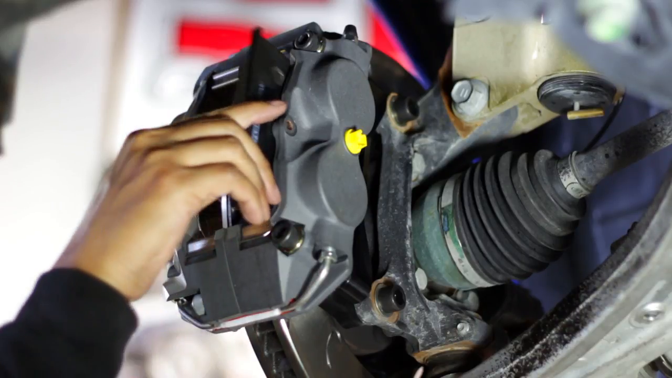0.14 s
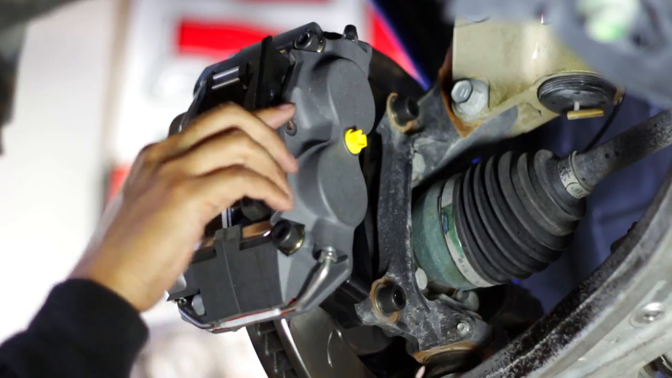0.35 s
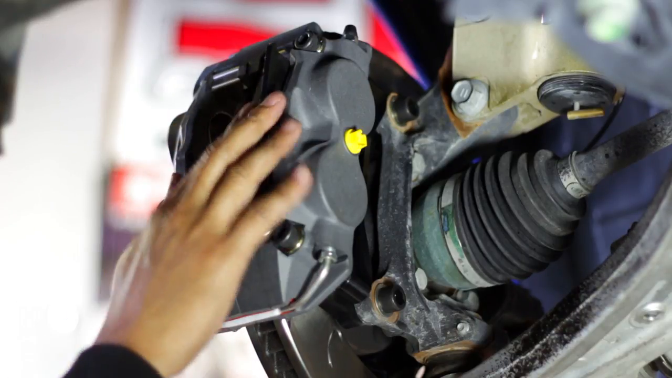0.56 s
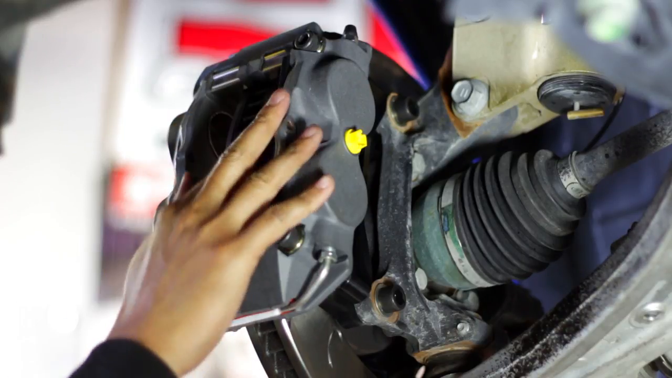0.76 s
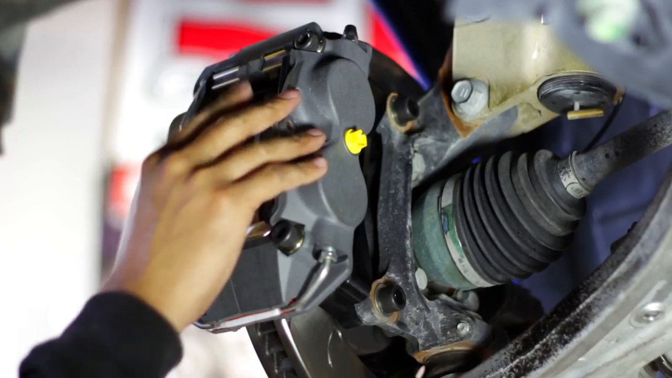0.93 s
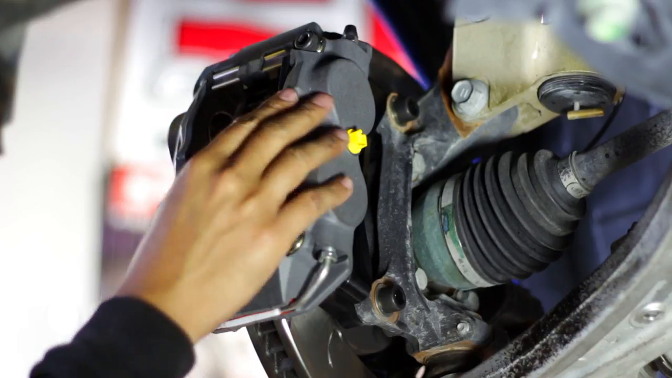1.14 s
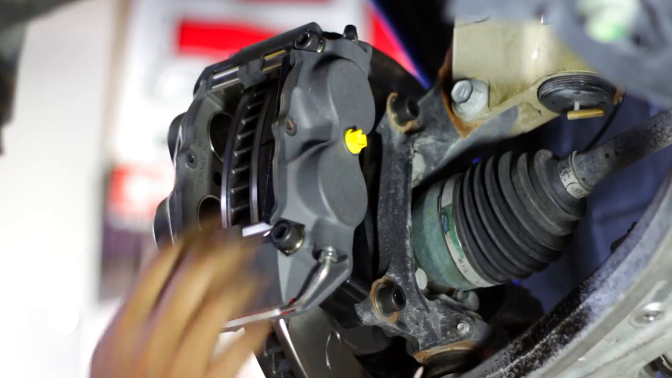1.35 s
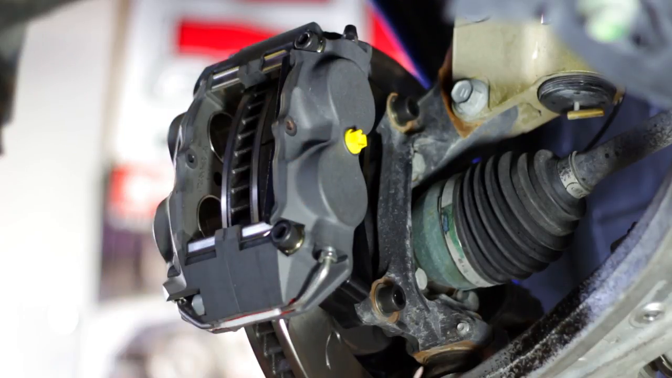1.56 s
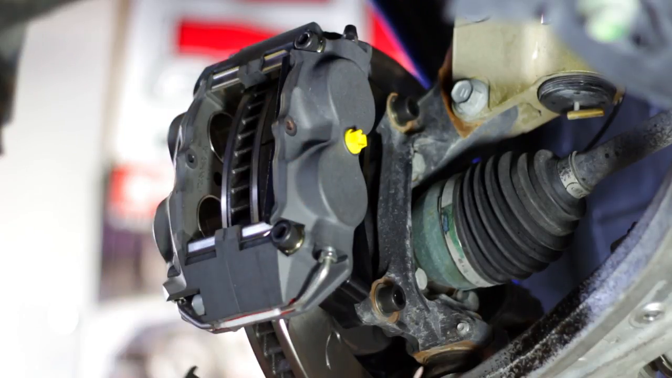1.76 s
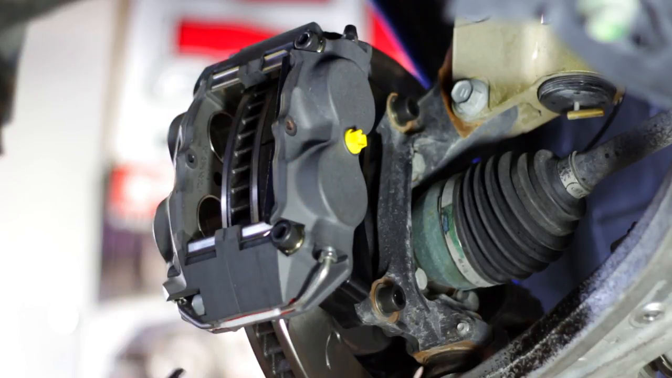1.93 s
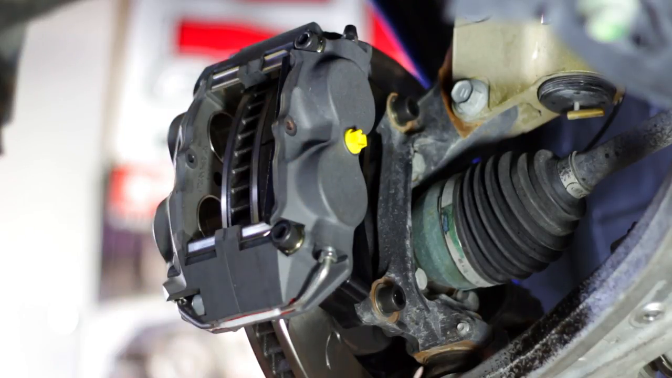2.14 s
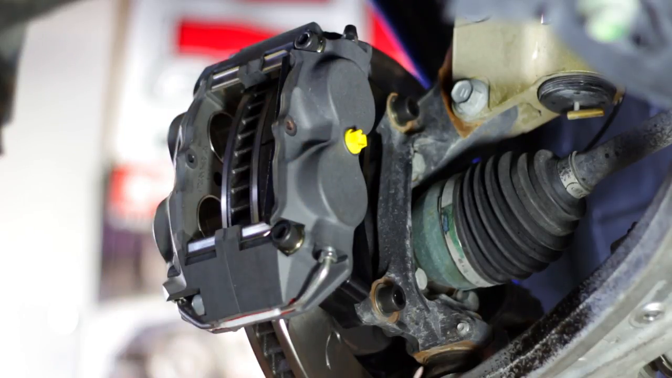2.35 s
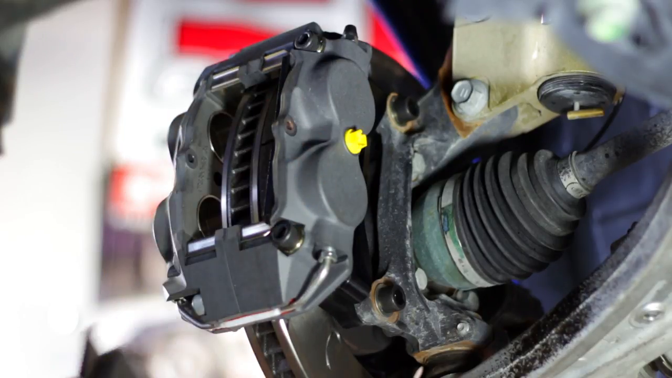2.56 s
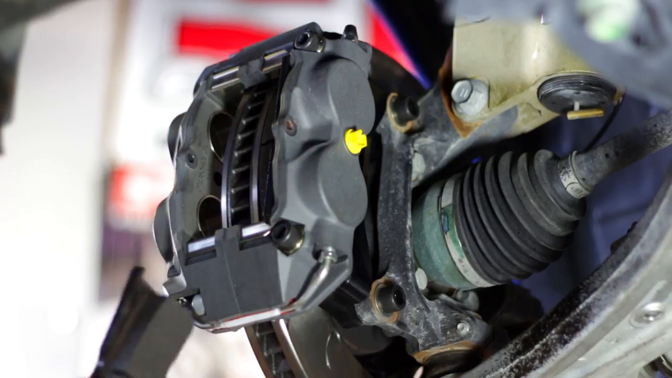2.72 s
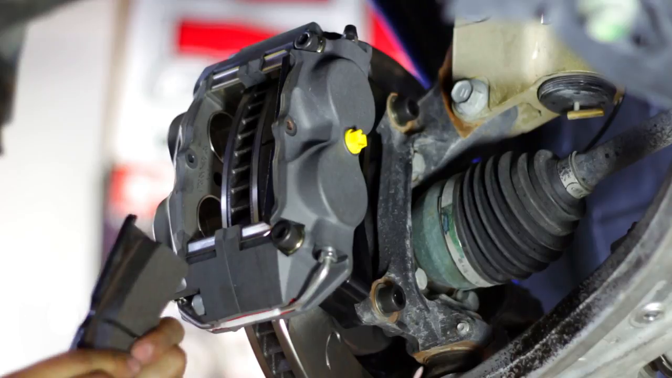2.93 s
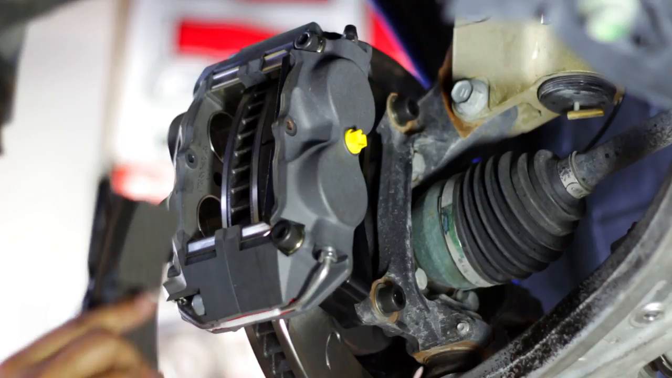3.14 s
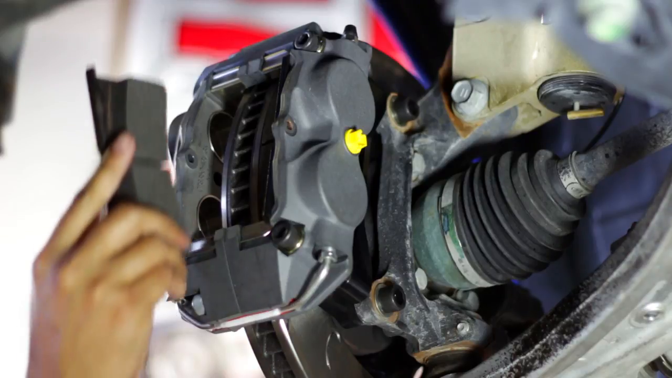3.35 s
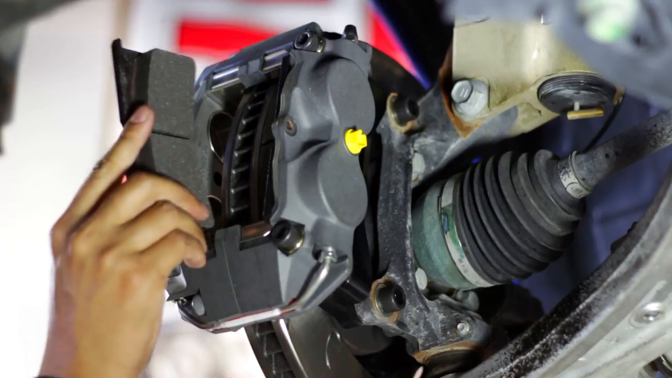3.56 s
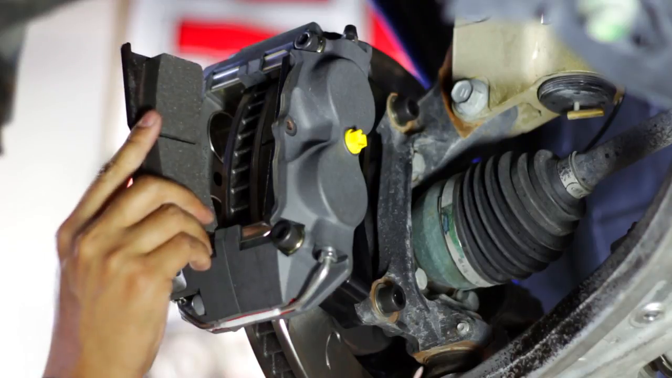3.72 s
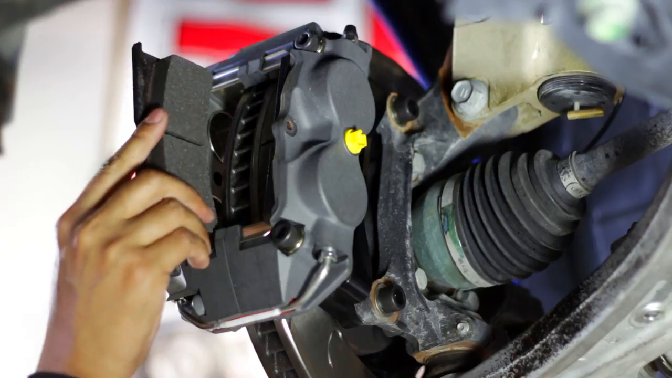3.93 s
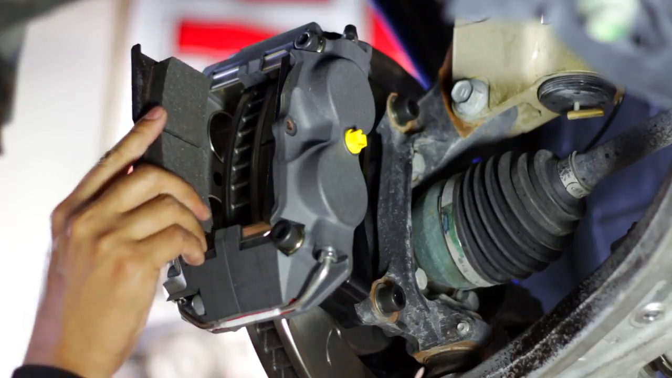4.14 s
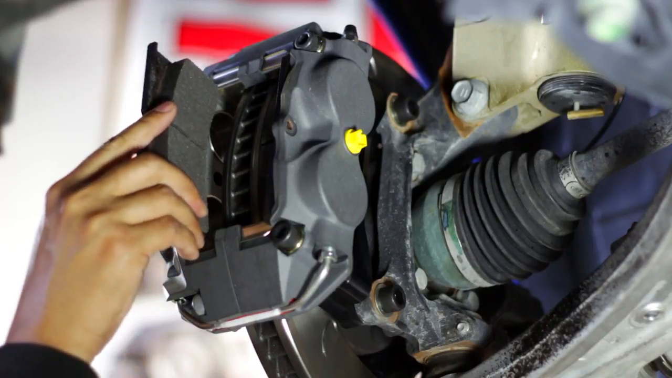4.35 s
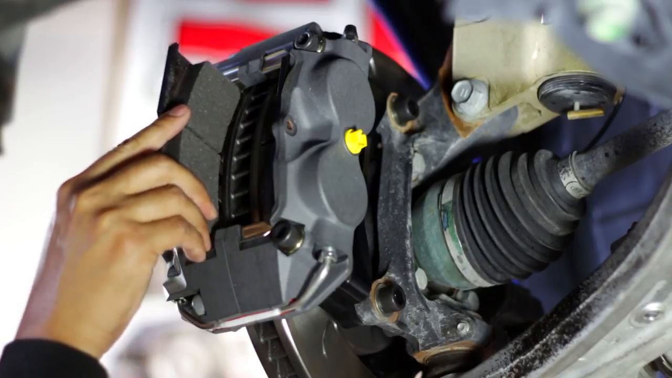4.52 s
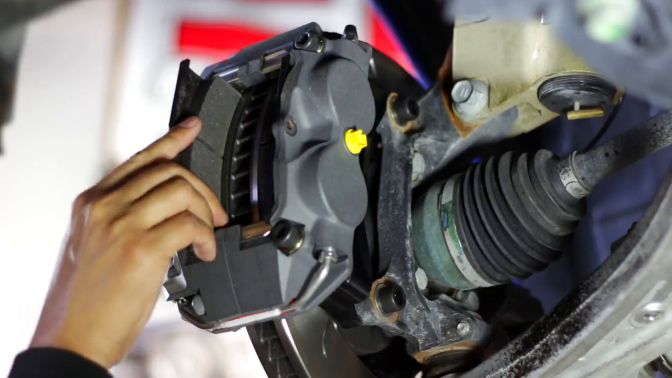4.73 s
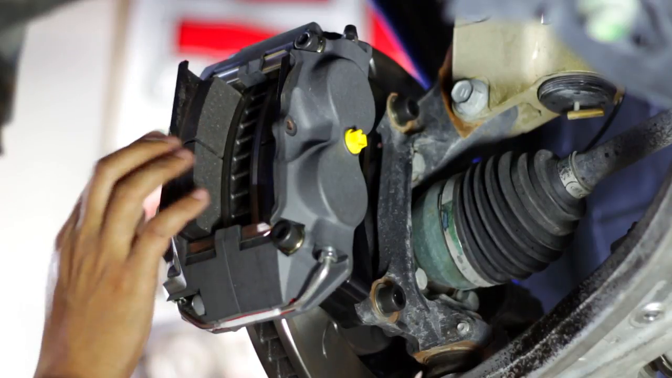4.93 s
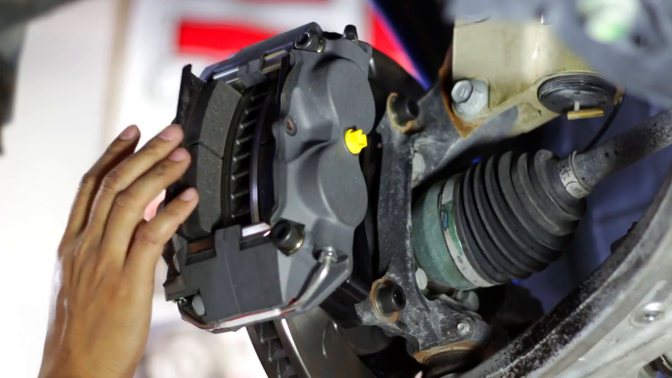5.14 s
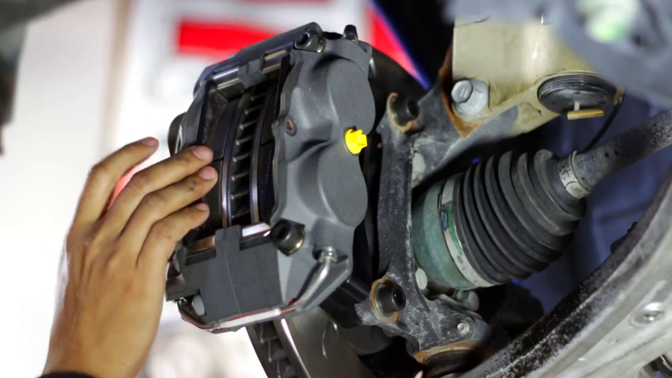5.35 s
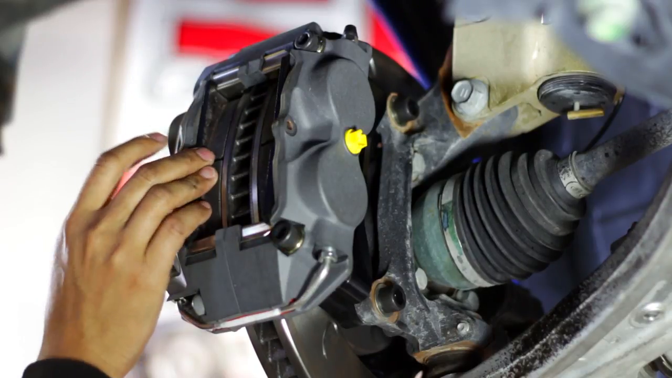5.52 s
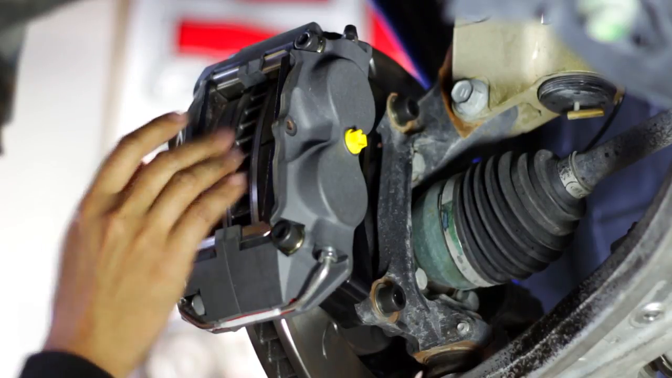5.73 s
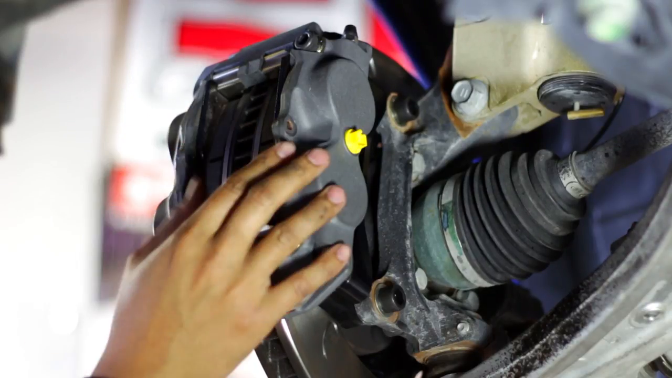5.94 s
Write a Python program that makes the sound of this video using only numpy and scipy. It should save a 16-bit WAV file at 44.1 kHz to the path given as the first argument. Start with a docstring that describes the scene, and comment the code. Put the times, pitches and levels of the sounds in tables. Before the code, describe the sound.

Hand fitting of metal brake pads, heard close and centred, with short diffuse reflections from garage walls. Dull thuds, dry clicks and brief rubbing lead to a bright clatter and two knocks. After over two seconds of faint fan hum, softer taps and slides resume, ending in a strong metallic snap, a scrape and a fading ring.

```python
"""Fitting brake pads by hand

Two brake pads are pushed by hand into a car's caliper, in a small garage. Their steel backing plates tap and
scrape along the casting, then seat with a clack. Blows and random slips excite decaying modes and dense noise;
freed plates, and the caliper after the seating clack, ring on. The walls answer with a diffuse tail, and
filtered noise and fan tones murmur behind."""
import sys
import numpy as np
from scipy import signal
from scipy.fft import rfft, irfft, next_fast_len
from scipy.io import wavfile
from scipy.ndimage import map_coordinates

SR = 44100
rng = np.random.default_rng(int(sys.argv[2]) if len(sys.argv) > 2 else 0)


def pcm_store(signal):
    """Save signal as 16-bit PCM."""
    levels = np.round(np.clip(np.atleast_2d(signal), -1, 1) * 32767)
    wavfile.write(sys.argv[1], SR, levels.astype(np.int16).T)


N = 268128  # length in samples

# Modes of each pad's backing plate. Each row: frequency in Hz, relative level in dB, t60 in seconds.
INNER_PAD = [(2050, 1, 0.062), (3063, -1.5, 0.067), (3300, -5, 0.028), (4233, -1, 0.011),
             (7450, -21.5, .03)]
OUTER_PAD = [(2077, 1.5, 0.08), (2065, 3, .055), (3110, -20.5, 0.04), (4330, -19.5, 0.04)]
SWAP_S = 3  # the inner pad goes in before this time, the outer pad after it


def amp(db):
    """Level: decibels to amplitude gain."""
    return 10 ** (np.asarray(db) / 20)


def unit(x):
    """Normalisation: x at rms 1."""
    return x / np.sqrt(np.mean(x ** 2) + 1e-20)


def struck(x):
    """Normalisation of a transient: x at rms 1 over its first 15 ms."""
    return x / np.sqrt(np.mean(x[:int(.015 * SR)] ** 2) + 1e-20)


def along(points, hz):
    """Interpolation: (Hz, value) points read on a logarithmic frequency axis."""
    f, v = np.transpose(points)
    return np.interp(np.log(hz + 1), np.log(f + 1), v)


def wobble(rate):
    """Slow random modulation: a smooth curve through random knots, rate of them a second."""
    knots = rng.standard_normal(int(N * rate / SR) + 4)
    return map_coordinates(knots, [np.arange(N) * rate / SR])


def filtered(x, response):
    """Zero-phase filtering: the spectrum of x times a response of frequency."""
    n = x.shape[-1]
    m = next_fast_len(n + 8192)  # silence appended against wrap-around
    return irfft(rfft(x, m) * response(np.fft.rfftfreq(m, 1 / SR)), m)[..., :n]


def coloured(x, points, size=2048):
    """Minimum-phase filtering: a folded cepstrum makes a causal filter of the given dB curve."""
    cepstrum = irfft(np.log(amp(along(points, np.fft.rfftfreq(size, 1 / SR)))))
    cepstrum[1:size // 2] *= 2
    cepstrum[size // 2 + 1:] = 0
    impulse_response = irfft(np.exp(rfft(cepstrum)))
    return signal.fftconvolve(x, impulse_response)[:len(x)]


def band(x, hz, kind, order=4):
    """Causal Butterworth filtering: low-, high- or band-pass."""
    edges = np.minimum(hz, SR / 2 - 100)
    return signal.sosfilt(signal.butter(order, edges, kind, fs=SR, output="sos"), x)


def add(track, s, x):
    """Superposition: mix x into track from time s in seconds."""
    part = track[max(round(s * SR), 0):][:len(x)]
    part += x[:len(part)]


def ventilation(level_db=-60, rumble_hz=250, rumble_sway_db=3.5, air_sway_db=2.5, hum_db=-3):
    """Broadband flow noise, partly coherent between the ears, whose level sways, with unsteady fan tones."""
    # Each row: frequency in Hz, relative spectral level in dB per Hz.
    murmur_spectrum = [(22, -13.5), (30, -8.5), (55, -10), (100, -9), (146, -3), (175, -8), (320, -9),
                       (400, -12), (470, -5), (560, -11.5), (800, -13), (1000, -19), (1300, -29),
                       (2400, -40.5), (5000, -120)]
    # Each row: frequency in Hz, left-right correlation.
    likeness = [(25, 0.26), (80, 0.8), (200, 0.98), (1000, 0.85), (3000, 0.27)]
    # Fan tones. Each row: frequency in Hz, level in dB before the common trim hum_db.
    fan_tones = [(145.3, -69), (323.0, -73.5), (457.6, -72), (635.2, -73)]

    def mid_side(hz):
        # mid and side energies differ by the cosine of twice this angle, the correlation
        angle = np.arccos(np.clip(along(likeness, hz), -1, 1)) / 2
        return amp(along(murmur_spectrum, hz)) * [np.cos(angle), np.sin(angle)]

    mid, side = filtered(rng.standard_normal((2, N)), mid_side)
    flow = amp(level_db) * unit(np.array([mid + side, mid - side]))
    rumble = filtered(flow, lambda hz: hz < rumble_hz)
    airy = flow - rumble
    air = rumble * amp(rumble_sway_db * wobble(17)) + airy * amp(air_sway_db * wobble(10))
    t = np.arange(N) / SR
    tones = np.zeros(N)
    for hz, db in fan_tones:
        gain = np.sqrt(2) * amp(db + hum_db + 4.5 * wobble(9))
        tones += gain * np.sin(2 * np.pi * hz * t + 0.74 * wobble(17))
    return (air + tones) * amp([[-.4], [.4]])  # slightly stronger on the right


def hiss(level_db=-78.0):
    """Faint microphone hiss: stationary coloured noise, uncorrelated left and right."""
    # Each row: frequency in Hz, relative spectral level in dB per Hz.
    hiss_spectrum = [(1470, -33.5), (2500, -0.5), (4820, -3.5), (7560, -3), (11500, -5), (13300, -2.5),
                     (15500, -7.5)]
    noise = rng.standard_normal((2, N))
    return amp(level_db) * unit(filtered(noise, lambda hz: amp(along(hiss_spectrum, hz))))


def in_garage(x, wet_db=0, delay=0.02):
    """Diffuse reverberation: the direct sound plus a noise tail; each frequency dies at its own speed."""
    # Each row: frequency in Hz, t60 in seconds.
    garage_t60 = [(120, 0.8), (500, 0.85), (1300, 0.74), (2500, 0.75), (5000, 0.45), (10000, .52)]
    # The treble radiates away from the microphone and returns from the walls.
    # Each row: frequency in Hz, tail level in dB re direct, before the gradual onset.
    tail_level = [(150, -5.5), (700, -15), (1500, -17), (2200, -9.5), (3200, -10.5), (5000, -9.5),
                  (10000, 4)]
    t = np.arange(int(.7 * SR)) / SR
    hz, when, z = signal.stft(rng.standard_normal(len(t)), SR, nperseg=256)
    t60 = along(garage_t60, hz)[:, None]
    equal_energy = np.sqrt(np.log(1e6) / (t60 * SR))  # cancels the effect of decay time on energy
    share = amp(wet_db + along(tail_level, hz))[:, None] * equal_energy
    tail = signal.istft(z * share * amp(-60 * when / t60), SR, nperseg=256)[1][:len(t)]
    tail *= 1 - np.exp(-(t / delay) ** 2)  # gradual onset
    tail[0] = 1  # the direct sound
    return signal.fftconvolve(x, tail)


def casting(t60, pad, modes_db=-5, crack_db=-4, crack_t60=0.011, chatter_s=0.0076):
    """Modal impact response: a crack, brief chatter, a dense ring and main modes at new strengths."""
    # Main modes of the caliper. Each row: frequency in Hz, relative level in dB, t60 in seconds.
    caliper_modes = [(256, -4.5, 0.014), (417, -15.5, .11), (480.5, 3.5, 0.21), (628, -8.5, 0.15),
                     (814, -4.5, 0.28), (1000, -8, 0.058), (1082.5, 5, 0.076), (1249, 2.5, 0.042),
                     (1369, -9.5, 0.17), (1431, -18.5, .07), (1530, -14.5, 0.027)]
    # The crowd of weaker, quickly damped modes. Each row: frequency in Hz, relative level in dB per Hz.
    dense_spectrum = [(60, -36.5), (130, -1), (220, 6.5), (500, 7.5), (900, 4.5), (1250, 5), (2050, -6),
                      (2500, -12), (3400, -11), (4500, -24), (5500, -27.5), (7200, -31), (8500, -49.5),
                      (14000, -42)]
    t = np.arange(SR // 5) / SR
    # the noise holds its level during the chatter, then decays
    shock = struck(amp(-60 * np.maximum(t - chatter_s, 0) / t60) * rng.standard_normal(len(t)))
    shock += amp(crack_db) * struck(amp(-60 * t / crack_t60) * rng.standard_normal(len(t)))
    hz, db, life = np.transpose(caliper_modes + pad)[:, :, None]
    strength = amp(db + 2 * rng.standard_normal(db.shape)) * rng.choice([-1, 1], db.shape)
    hz = hz * (1 + 0.0045 * rng.standard_normal(hz.shape))  # the grip of the hand shifts the modes
    modes = np.sum(strength * amp(-60 * t / life) * np.sin(2 * np.pi * hz * t), axis=0)
    return struck(coloured(shock, dense_spectrum)) + amp(modes_db) * struck(modes)


def plate(hz, t60=0.032):
    """Damped oscillation: one decaying mode, by default soon damped by the hand."""
    t = np.arange(SR // 5) / SR
    onset = 1 - np.exp(-t / 0.0016)
    return struck(amp(-60 * t / t60) * onset * np.sin(2 * np.pi * hz * t))


def contacts(t60=0.1, low_life=1.8, high_life=.65, ring_db=-2, ring_db_per_octave=-5):
    """Impact spectrum: weight gives thud, a sharp edge gives bite, contact time cuts off the treble."""
    # Plate meets caliper. Each row: start in seconds, clack level in dB, thud in dB re clack,
    # bite in dB re clack, contact cut-off in Hz, pitch that the point of contact rings most in Hz.
    blows = [(0.115, -62, 10.5, -17, 1540, 1204), (.238, -44.5, -7, -23, 4350, 2077),
             (.252, -44, 2.5, -13.5, 3840, 288), (0.3191, -54.5, 2.5, -17, 2180, 1340),
             (.350, -41.5, -5.5, -11.5, 3720, 1220), (.617, -50, -2.5, -34, 1940, 1348),
             (0.671, -39.5, -13, -13.5, 4450, 1046), (.698, -35.5, -19, -14, 4560, 1050),
             (0.707, -30.5, -5.5, -15.5, 5760, 1082), (.714, -34, -18, -3.5, 7100, 2176),
             (.738, -36, -3, -3, 7000, 833), (1.4085, -34.5, -1, -18.5, 3600, 1247),
             (1.428, -37, -1, -7, 4020, 795), (3.925, -45, 3.5, -10, 3300, 766),
             (3.934, -48.5, 2, -13.5, 4220, 233), (4.181, -42, -8.5, -18, 4580, 1100),
             (4.258, -45.5, 4.5, -37, 2660, 621), (4.505, -53.5, 4, -29, 1980, 2080),
             (4.594, -52, 2.5, -31, 2120, 1960), (4.6132, -33.5, -6, -10, 5000, 1910),
             (4.803, -42.5, -5, -29, 3300, 1395), (4.997, -53, -4.5, -21.5, 2280, 1340),
             (5.176, -50, -1.5, -19, 2270, 827), (5.297, -44, -8.5, -29.5, 2400, 950),
             (5.3078, -23.5, -11.5, -18, 13000, 1698), (5.311, -27.5, -6, -12, 9800, 481),
             (5.353, -35, -2, -18, 9140, 485)]
    out = np.zeros(N)
    for s, db, thud_db, bite_db, cut_hz, ring_hz in blows:
        pad = INNER_PAD if s < SWAP_S else OUTER_PAD
        # the dense ring lasts longer in the low band and dies sooner in the high band
        thud = struck(band(casting(low_life * t60, pad), 600, "low", order=5))
        clack = struck(band(casting(t60, pad), [620, 2400], "band", order=4))
        bite = struck(band(casting(high_life * t60, pad), 2200, "high", order=5))
        octaves = np.log2(ring_hz / 1000)  # above 1 kHz; higher pitches ring less
        ring = amp(ring_db + ring_db_per_octave * octaves) * plate(ring_hz)
        blow = clack + amp(thud_db) * thud + amp(bite_db) * bite + ring
        softened = band(blow, cut_hz, "low", order=20)
        add(out, s, amp(db) * in_garage(softened))
    return out


def slides(slips_per_s=600):
    """Stick-slip friction: rubbing steel catches and slips at random; each slip nudges the casting."""
    # The pad rubs along its guide, or the hand over the pad.
    # Each row: middle in seconds, half length in seconds, level in dB, low-pass cut-off in Hz.
    strokes = [(.215, 0.036, -53.5, 1310), (.275, 0.018, -41, 395), (.442, 0.072, -58.5, 1400),
               (.64, 0.047, -52.5, 1590), (0.753, 0.011, -46, 2400), (1.455, .018, -44, 900),
               (2.728, .1, -62.5, 900), (3.742, 0.042, -53.5, 556), (3.983, 0.029, -45.5, 375),
               (4.33, 0.055, -57.5, 595), (4.89, 0.042, -49, 653), (5.226, .06, -55.5, 1400),
               (5.364, .018, -32.5, 620), (5.7, 0.062, -59.5, 605)]
    out, t = np.zeros(N), np.arange(SR // 3) / SR
    for s, half, db, bright_hz in strokes:
        swell = np.exp(-(t / half - 2) ** 2)  # peaks two half lengths in
        slips = (rng.random(len(t)) < slips_per_s / SR) * rng.standard_normal(len(t))
        nudge = casting(0.034, INNER_PAD if s < SWAP_S else OUTER_PAD, modes_db=-13.0)
        rub = band(signal.fftconvolve(slips, nudge)[:len(t)], bright_hz, "low", order=6)
        add(out, s - 2 * half, amp(db) * in_garage(swell * unit(rub)))
    return out


def lingering(hz, t60=0.93, width_hz=75, level_db=-2):
    """Beating of close modes: a fuzzy after-ring from narrow-band noise around the plate's pitch."""
    t = np.arange(int(.7 * SR)) / SR
    cluster = filtered(rng.standard_normal(len(t)), lambda f: 1 / (1 + ((f - hz) / width_hz) ** 2))
    return unit(cluster) * amp(level_db - 60 * t / t60) * (1 - np.exp(-t / 0.011))


def rings_on(t60=0.11, overtone_ratio=1.3, overtone_db=-14):
    """Free vibration: a loosened plate, or the caliper after the seating clack, sings on two bending modes,
    over a fuzzy after-ring."""
    # A firm blow knocks the pad free of the fingers, so it rings on; in the last row the seating clack rings
    # the caliper. Each row: start in seconds, pitch in Hz, ring level in dB, after-ring level in dB before the
    # trim inside lingering().
    after_rings = [(.738, 2142, -33, -59), (1.412, 2050, -37.5, -60.5), (4.613, 2008, -41, -63),
                   (5.311, 1315, -30, -40)]
    out = np.zeros(N)
    for s, hz, db, linger_db in after_rings:
        ring = plate(hz, t60) + amp(overtone_db) * plate(overtone_ratio * hz, t60)
        add(out, s, amp(db) * ring)
        add(out, s, amp(linger_db) * lingering(hz))
    return out


def scene(side_db=-22):
    """Mid-side image: the work is straight ahead; an extra wall tail is opposed left to right."""
    work = contacts() + rings_on() + slides()
    walls = in_garage(work)[:N] - work  # the tail without the direct sound
    side = amp(side_db) * walls
    return np.array([work + side, work - side]) + ventilation() + hiss()


def record(dry, top_hz=15700):
    """Band limitation: nothing is kept above top_hz."""
    return filtered(dry, lambda hz: hz < top_hz)


dry = scene()
out = record(dry)
pcm_store(out)
```